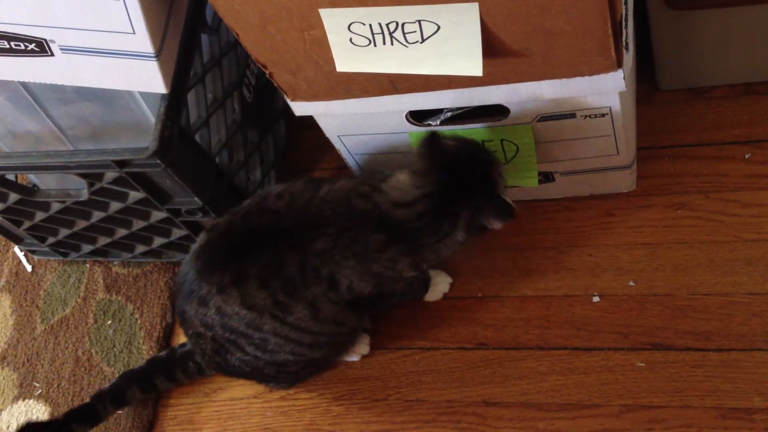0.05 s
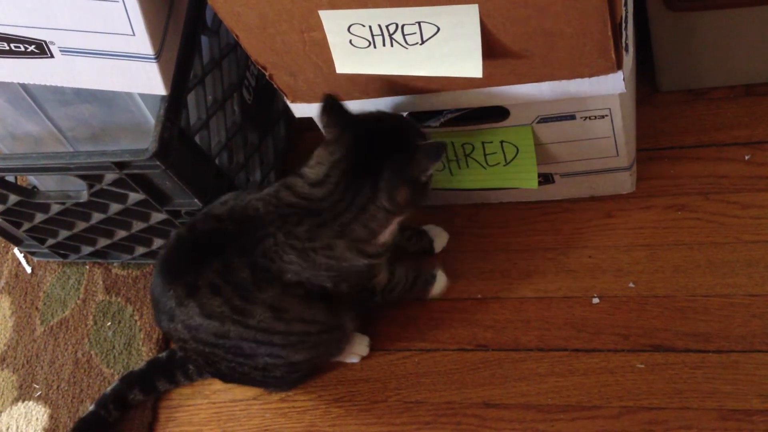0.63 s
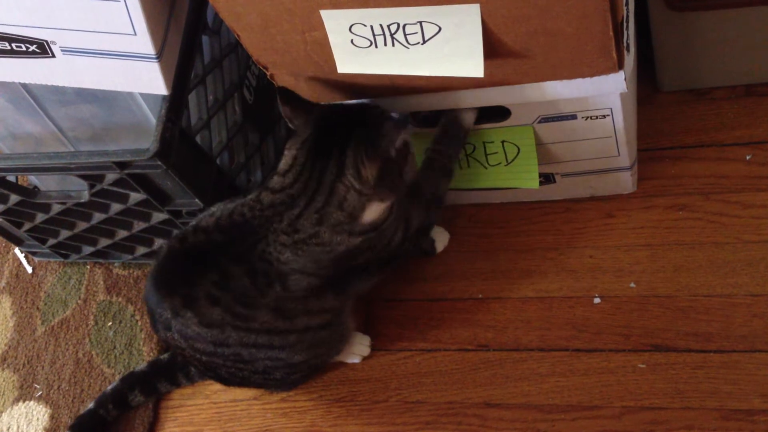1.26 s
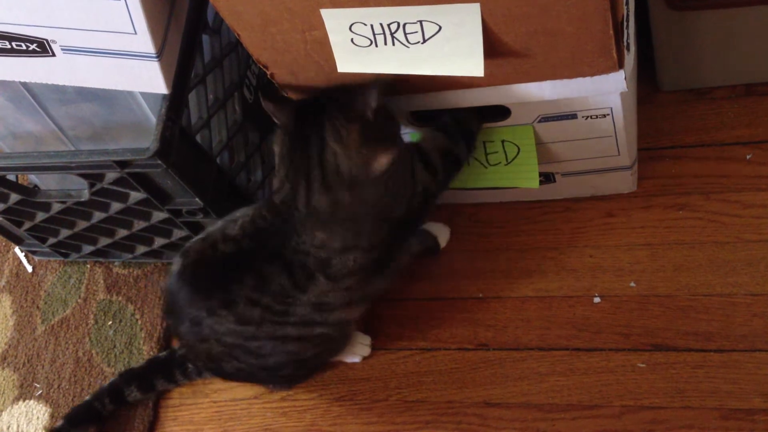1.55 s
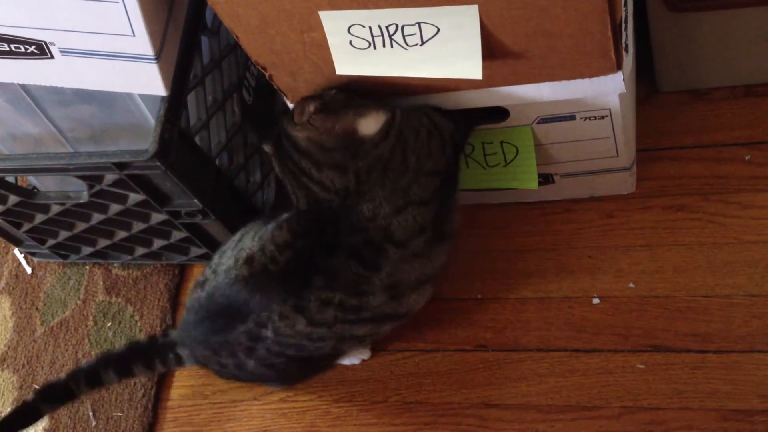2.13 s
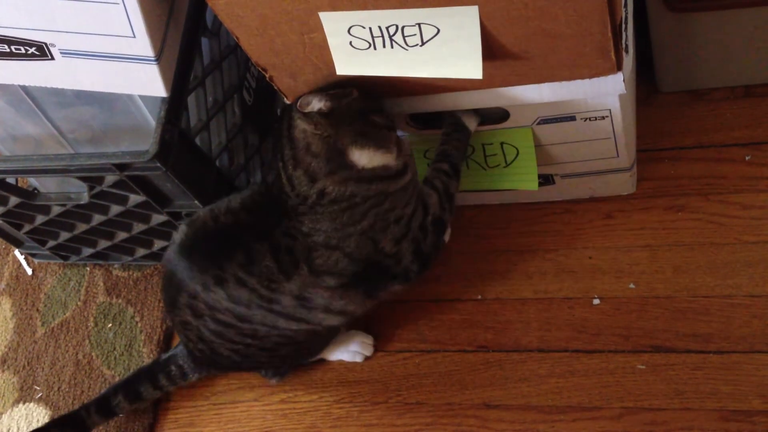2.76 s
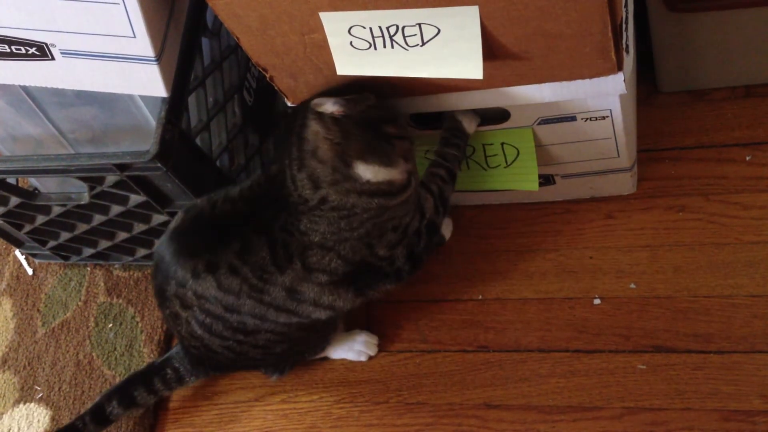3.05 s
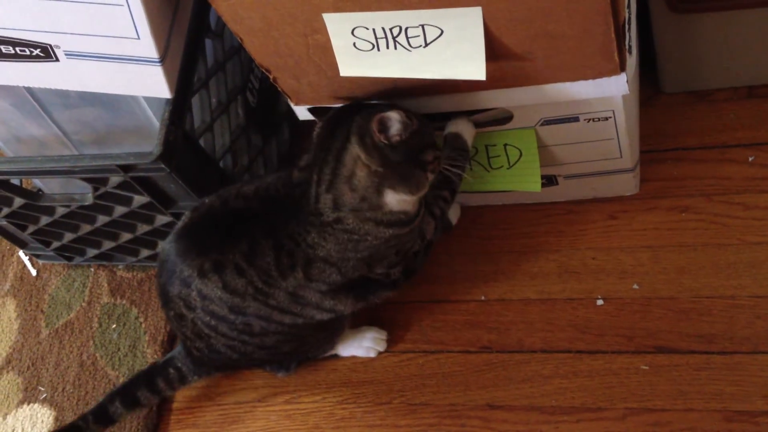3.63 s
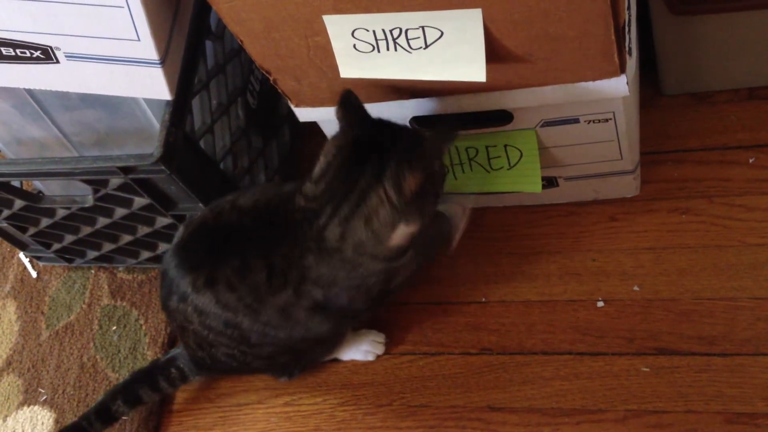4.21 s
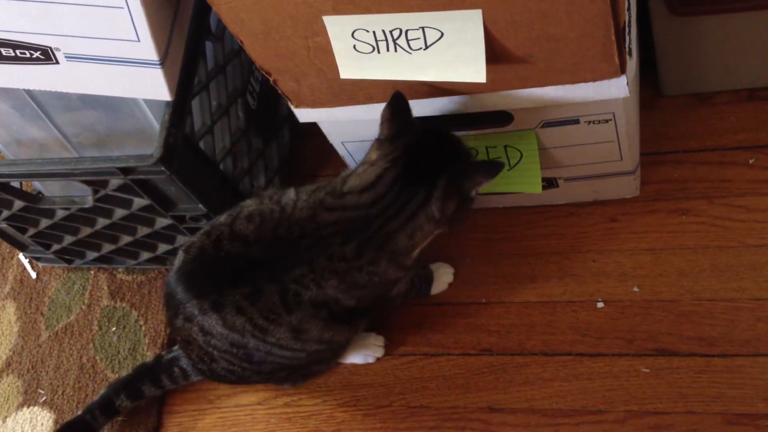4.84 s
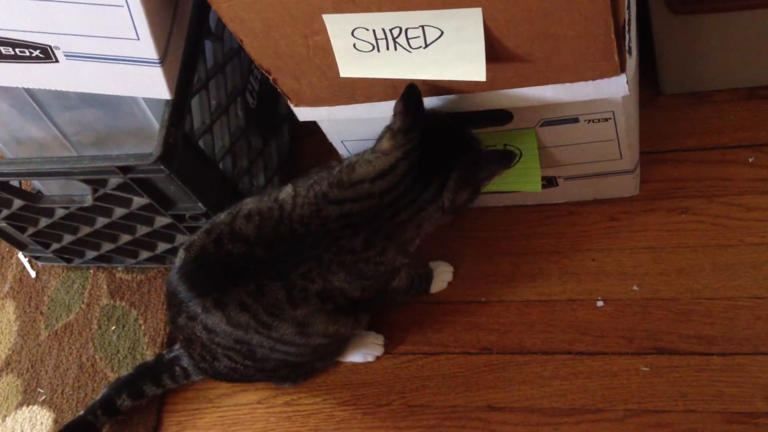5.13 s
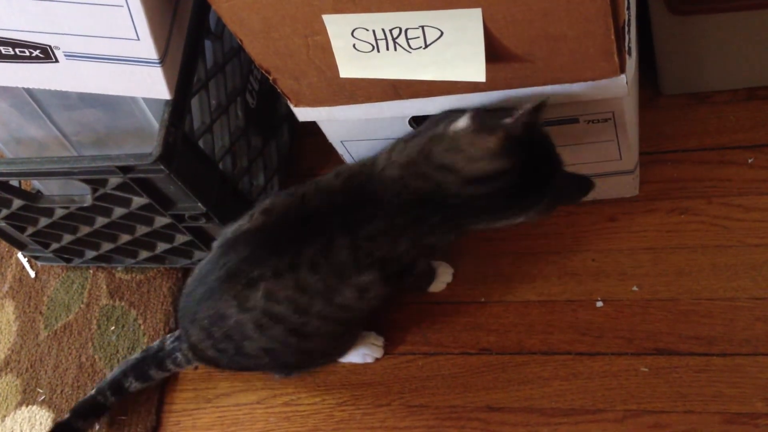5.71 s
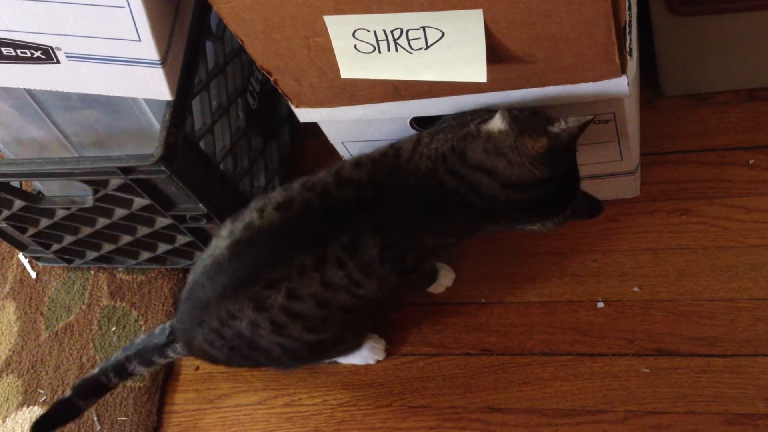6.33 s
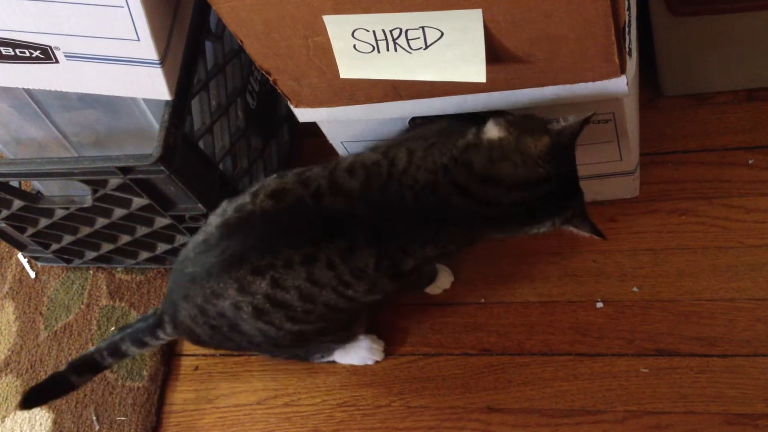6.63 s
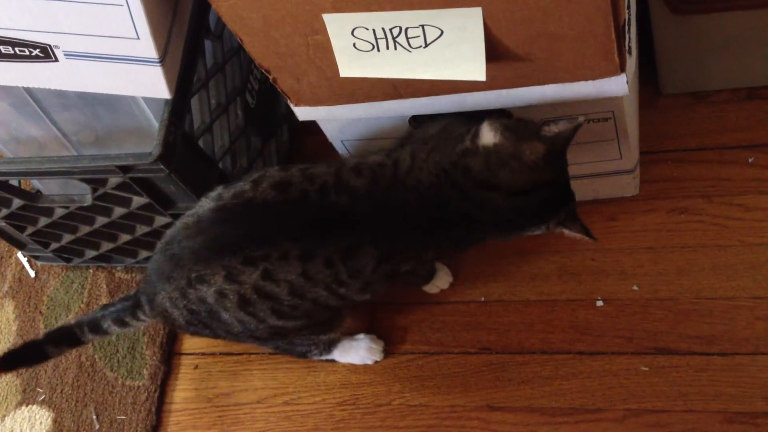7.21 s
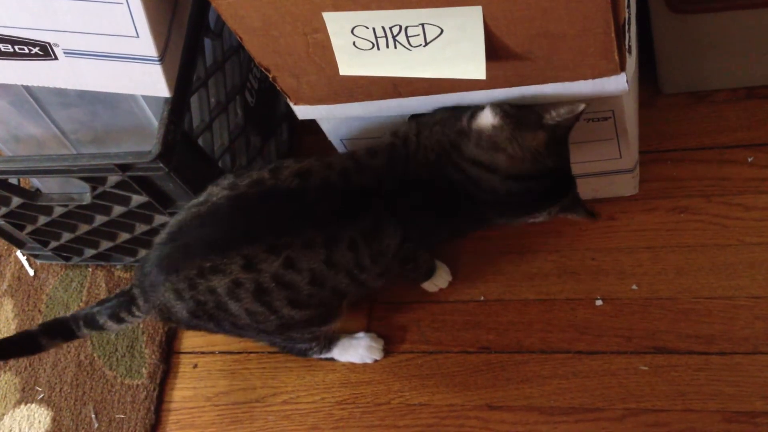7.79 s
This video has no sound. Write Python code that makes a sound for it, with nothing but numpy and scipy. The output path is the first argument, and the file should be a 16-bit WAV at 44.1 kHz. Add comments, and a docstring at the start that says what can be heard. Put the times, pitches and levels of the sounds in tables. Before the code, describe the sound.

Light claw taps and paper brushing come from a cardboard box, heard from nearby in a quiet room. A cat tugs and a sheet tears briefly with small crackles. Then the cardboard snaps back loudly twice, each time with a hollow thud. Following a short lull, faint rustles and scrapes return as the paw feels around inside, bumping the wall with a couple of clear, hollow knocks.

```python
"""A cat claws at paper through the hand hole of a cardboard file box, in a small quiet room.
From about 1 s, paper fibres snap, claws catch the cardboard and let it spring back, and a leg
brushes the sheets. Near 2.3 s the cat tugs, the wall trembles and a sheet tears in a short rip.
The two loudest plucks follow, at 3.4 s and 4 s. From about 5.3 s a paw gropes inside the box:
it brushes the sheets, drags a claw over them and knocks on the hollow wall."""
import sys
import numpy as np
from scipy import signal
from scipy.io import wavfile

SR = 44100
rng = np.random.default_rng(int(sys.argv[2]) if len(sys.argv) > 2 else 0)


def materialize(psi):
    """Save the field psi as 16-bit PCM at rate SR to the path in sys.argv[1].

    A 1-D psi becomes a single channel; in a 2-D psi each row is a channel.
    """
    bounded = np.clip(np.atleast_2d(psi).T, -1, 1)
    quanta = np.round(bounded * 32767).astype(np.int16)
    wavfile.write(sys.argv[1], SR, quanta)


N = 351036
TIME = np.arange(N) / SR  # seconds into the scene
HIT_TIME = np.arange(8192) / SR  # seconds into one short sound

# Paper fibres break. Each row: start in seconds, level in dB.
FIBRE_SNAPS = [(0.9522, -58), (1.024, -65), (1.053, -60), (1.296, -61.5), (2.105, -58.5), (2.2935, -57),
               (2.466, -50), (2.4937, -43), (2.5135, -38.5), (2.5371, -42), (2.5544, -43), (2.5605, -32),
               (2.5672, -40), (2.596, -36), (2.615, -39.5), (2.6944, -33.5), (2.805, -65), (2.9897, -66.5),
               (3.02, -64.5), (3.0629, -54), (3.407, -27.5), (4.0322, -24.5)]
# Claws pluck the box wall. Each row: start in seconds, then crack, low thud and hollow clack in dB.
CLAW_PLUCKS = [(0.9579, -55.5, -40.5, -41), (0.9756, -60.5, -44, -50.5), (1.1012, -56.5, -49.5, -54),
               (1.155, -68, -51.5, -62), (1.2174, -66, -57, -54), (1.2355, -63.5, -45.5, -50.5),
               (1.295, -58.5, -54, -56.5), (1.3529, -65, -60, -50.5), (1.4019, -58.5, -42.5, -48.5),
               (1.565, -79, -56, -82), (1.8715, -51.5, -46.5, -55), (2.1264, -52.5, -33.5, -46),
               (2.2171, -58, -29.5, -56), (2.2359, -50.5, -26.5, -36), (2.3239, -58, -36, -53),
               (2.424, -47, -41, -54), (2.462, -41.5, -25.5, -28.5), (2.4814, -41, -34.5, -34.5),
               (2.5124, -58.5, -32, -39), (2.5638, -46, -36.5, -40.5), (2.6942, -49, -32.5, -39.5),
               (2.7096, -39, -41.5, -35), (2.9204, -60, -55, -68), (3.0556, -59, -47, -54.5),
               (3.1243, -41, -25.5, -38), (3.1328, -56, -31, -35), (3.192, -44, -28, -38.5),
               (3.3826, -28, -15, -17), (3.3966, -25, -30.5, -25), (3.407, -24.5, -17.5, -17),
               (3.6119, -64, -67.5, -59.5), (3.6864, -75, -58, -60.5), (3.9201, -80, -54.5, -64.5),
               (4.0272, -26, -16.5, -19), (4.0326, -44.5, -19.5, -25.5)]
# The leg brushes over paper. Each row: middle in seconds, length in seconds, level in dB.
LEG_BRUSHES = [(1.125, 0.16, -58.5), (1.235, 0.043, -60), (1.38, .12, -55), (1.645, 0.17, -60),
               (1.78, 0.1, -62.5), (1.915, 0.18, -59.5), (2.12, 0.066, -52.5), (2.29, 0.18, -56),
               (2.38, 0.12, -46), (2.55, .26, -53.5), (3.995, 0.13, -57.5), (5.263, 0.065, -61.5),
               (5.52, 0.33, -66), (5.675, 0.12, -55), (5.83, 0.45, -57.5), (6.23, 0.28, -57),
               (6.44, 0.32, -57.5), (6.75, 0.26, -56.5), (7.01, 0.32, -58), (7.295, 0.18, -54),
               (7.44, 0.36, -63.5), (7.63, .2, -67.5), (7.752, 0.16, -52.5), (7.95, 0.24, -62)]
# Claws scrape the cardboard. Each row: middle in seconds, length in seconds, level in dB.
CLAW_SCRAPES = [(1.22, 0.12, -61), (2.05, .12, -66.5), (2.33, 0.34, -53.5), (2.455, .07, -39.5),
                (2.57, 0.28, -54.5), (3.7, .3, -76.5), (3.772, 0.079, -63.5), (5.81, .17, -56),
                (6.23, .2, -65.5), (6.37, 0.25, -58), (6.93, 0.28, -56), (7.295, 0.052, -53),
                (7.41, 0.34, -58.5), (7.77, 0.081, -57.5), (7.88, 0.2, -59)]
# How loud the rip is as it runs. Each row: time in seconds, level in dB.
RIP_LEVELS = [(2.25, -70), (2.3, -55), (2.41, -63), (2.424, -39.5), (2.45, -58), (2.475, -36.5),
              (2.505, -44), (2.55, -53), (2.59, -55), (2.661, -82)]
# A claw drags on a sheet. Each row: start in seconds, length in seconds, level in dB, pitch in Hz.
CLAW_DRAGS = [(5.72, 0.21, -61, 2020), (6.816, 0.075, -61.5, 2120), (6.939, 0.09, -57, 2260),
              (7.306, 0.16, -58.5, 1730), (7.823, 0.11, -59.5, 1600)]
# The paw knocks from inside. Each row: start in seconds, hollow clack in dB, low thud in dB.
PAW_KNOCKS = [(5.837, -69, -43.5), (5.867, -38, -34.5), (5.931, -58, -45.5), (6.317, -50.5, -42),
              (6.421, -19.5, -29.5), (6.897, -25, -30.5), (6.978, -43, -58), (7.036, -51.5, -46),
              (7.441, -49, -39.5), (7.482, -52, -45.5), (7.844, -61, -45.5), (7.864, -48, -48),
              (7.903, -57, -38.5)]

# The tones the box rings with (its modes). Each row: pitch in Hz, strength in dB.
RIM_TONES = [(135, -7), (179, -0.5), (205, 0.5), (250, -2), (292, -10.5), (334, -7), (415, -5), (468, -3.5),
             (510, -8.5), (550, -14.5), (642, -12.5), (678, -17.5), (713, -22), (762, -8.5), (844, -12),
             (892, -15), (931, -13), (1059, -18.5), (1192, -23.5), (1261, -24.5), (1444, -28), (1657, -24),
             (1816, -25.5), (1892, -22.5), (1986, -26), (2015, -29.5), (2328, -26.5)]  # plucked at the rim
WALL_TONES = [(105, -21), (158, 0), (210, 5.5), (252, 4), (332, -3.5), (369, -5), (410, 13), (528, -32),
              (572, 14), (620, 10.5), (669, -38), (705, -0.5), (748, 6.5), (807, 3.5), (882, -2), (947, 3),
              (989, 2), (1066, -20), (1235, -29), (1452, -38), (2169, -31)]  # knocked from inside

# Spectra: how strong a noise is from bass to treble. Each row: frequency in Hz, level in dB.
BACKGROUND_SPECTRUM = [(25, -37), (55, -34), (85, -17.5), (130, -9), (190, -1.5), (260, -5.5), (450, -11.5),
                       (900, -19), (2000, -23.5), (7500, -26), (10000, -36.5), (13500, -27), (15500, -31.5)]  # murmur and hiss
SNAP_SPECTRUM = [(30, -14), (500, -10), (1500, -9), (3000, -7), (4200, 0.5), (7000, 3.5), (8500, 0.5),
                 (11000, -12), (15000, -17.5)]  # paper fibres breaking
CRACK_SPECTRUM = [(25, 2), (60, -1.5), (110, -5.5), (600, -5.5), (1200, 6), (2000, 3.5), (3000, 1),
                  (4700, 1.5), (6500, -3.5), (8000, -2.5), (9800, -10), (12000, -3.5), (15000, -12)]  # cardboard fibres cracking
PANEL_SPECTRUM = [(60, -50), (250, -21.5), (450, -1.5), (700, 0), (1000, 3), (1400, -11.5), (2200, -15.5),
                  (5000, -33), (15000, -60)]  # the wall's many weak, overlapping tones
SWISH_SPECTRUM = [(80, -27), (300, -3), (450, 5), (850, 6.5), (1400, -6.5), (2200, -3), (4000, -2.5),
                  (7500, 3), (9800, -7.5), (12500, -1.5), (15000, -3.5)]  # leg on paper
SCRAPE_SPECTRUM = [(60, -36), (250, -11.5), (550, 0), (1000, 3), (1500, -3), (2100, -3), (3200, -7.5),
                   (6000, -16.5), (15000, -29.5)]  # claws on cardboard
RIP_SPECTRUM = [(30, -8.5), (500, -4.5), (1500, -8), (2500, 0), (4200, 6), (5500, -0.5), (8000, -4.5),
                (10000, -23), (15000, -21)]  # paper tearing
SCUFF_SPECTRUM = [(60, -15), (300, -16), (1200, 8.5), (2500, 5), (4000, -2), (7000, -8), (10000, -21.5),
                  (15000, -19)]  # paw meeting the wall

# Early echoes from floor and furniture. Each row: delay in seconds, level in dB.
ROOM_ECHOES = [(.0043, -19), (.0092, -20), (0.0128, -15), (0.0206, -25.5), (.0235, -21.5)]
# How long the room rings. Each row: frequency in Hz, seconds to fade by 60 dB.
ROOM_FADE = [(100, 0.17), (300, 0.34), (1000, 0.33), (3000, 0.32), (7000, .22), (14000, 0.26)]


def amp(db):
    """Turn decibels into a number to multiply by."""
    return 10 ** (np.asarray(db) / 20)


def unit_level(x):
    """Scale a sound so that its average level (rms) is 1."""
    return x / np.sqrt(np.mean(x ** 2) + 1e-20)


def unit_hit(x):
    """Scale a short sound to the energy of 10 ms at level 1."""
    return x / np.sqrt(np.sum(x ** 2) / (SR / 100) + 1e-20)


def look_up(table, hz):
    """Read between a table's rows, with frequencies spaced like musical pitch."""
    row_hz, values = np.transpose(table)
    return np.interp(np.log(hz + 1), np.log(row_hz + 1), values)


def add(mix, start, sound):
    """Mix a sound in at a start time in seconds."""
    part = mix[max(round(start * SR), 0):][:len(sound)]
    part += sound[:len(part)]


def colour(x, spectrum):
    """Give a sound a spectrum. The filter never rings ahead of a hit, so hits stay sharp."""
    log_gain = np.log(amp(look_up(spectrum, abs(np.fft.fftfreq(4096, 1 / SR)))))
    taps = np.fft.ifft(np.exp(np.conj(signal.hilbert(log_gain)))).real
    return signal.oaconvolve(x, taps[:len(taps) // 2])[:len(x)]


def burst(decay_s, linger_s, linger_db):
    """A spray of tiny breaks: it swells and dies fast, then the sheet rattles weakly."""
    age = HIT_TIME / max(decay_s, 0.0002)
    rattle = amp(linger_db) * np.exp(-HIT_TIME / linger_s)
    return rng.standard_normal(len(HIT_TIME)) * (1 - np.exp(-age)) * (np.exp(-age) + rattle)


def background(level_db=-66):
    """The low murmur of the room's air, with faint microphone hiss."""
    return amp(level_db) * unit_level(colour(rng.standard_normal(N), BACKGROUND_SPECTRUM))


def fibre_snaps(patch_hz=6370, pitch_spread=0.18):
    """Each breaking bundle of fibres is one sharp click that rings a small patch of paper."""
    out = np.zeros(N)
    for start, db in FIBRE_SNAPS:
        hz = patch_hz * (1 + pitch_spread * rng.uniform(-0.75, 1))
        click = unit_hit(signal.unit_impulse(len(HIT_TIME), round(0.0006 * SR)))
        splinters = unit_hit(burst(decay_s=0.0011, linger_s=0.0056, linger_db=-22.5))
        tick = unit_hit(colour(click + 2.3 * splinters, SNAP_SPECTRUM))
        patch = unit_hit(np.sin(2 * np.pi * hz * HIT_TIME) * HIT_TIME * np.exp(-HIT_TIME / 0.00016))
        add(out, start, amp(db) * (tick + 0.6 * patch))
    return out


def ring(tones, scatter_db, width_hz=24, loss=0.0083):
    """One row for each fading tone. Cardboard damps high ones sooner, and no two hits are alike."""
    hz, db = np.transpose(tones)[:, :, None]
    width = width_hz + loss * hz  # a wider tone dies sooner
    size = amp(db + scatter_db * rng.standard_normal(hz.shape)) * width
    waves = np.sin(2 * np.pi * (hz * HIT_TIME + rng.random(hz.shape)))
    return size * np.exp(-np.pi * width * HIT_TIME) * waves


def cut_bass(x, below_hz):
    """Take away the deepest bass, below a given pitch."""
    return signal.sosfilt(signal.butter(4, below_hz, "high", fs=SR, output="sos"), x)


def box_hit(tones, thud_db, clack_db, thud_rise_s, clack_rise_s, width_hz, loss, weak_gain):
    """The whole wall swings in its low tones (the thud); the high ones soon die (the clack)."""
    ringing = ring(tones, scatter_db=2.0, width_hz=width_hz, loss=loss)
    is_low = np.transpose(tones)[0] < 380  # Hz
    thud = ringing[is_low].sum(0) * (1 - np.exp(-HIT_TIME / thud_rise_s))
    clack = ringing[~is_low].sum(0) * (1 - np.exp(-HIT_TIME / clack_rise_s))
    clack *= 1 + 1.6 * np.exp(-HIT_TIME / 0.005)  # a hard-bent wall loses most of its swing early
    weak_tones = colour(burst(decay_s=0.0017, linger_s=0.02, linger_db=-21), PANEL_SPECTRUM)
    clack = unit_hit(cut_bass(clack, below_hz=266)) + weak_gain * unit_hit(weak_tones)
    return amp(thud_db) * unit_hit(cut_bass(thud, below_hz=115)) + amp(clack_db) * unit_hit(clack)


def claw_plucks():
    """A claw slips off the rim: fibres crack and the wall springs back."""
    out = np.zeros(N)
    for start, crack_db, thud_db, clack_db in CLAW_PLUCKS:
        slip_s = 0.00026 * amp(-0.5 * crack_db)  # a gentle pull lets go more slowly
        crack = colour(burst(decay_s=slip_s, linger_s=0.021, linger_db=-22.5), CRACK_SPECTRUM)
        add(out, start, amp(crack_db) * unit_hit(crack))
        spring = box_hit(RIM_TONES, thud_db, clack_db, thud_rise_s=0.00053, clack_rise_s=0.00082,
                         width_hz=17, loss=0.012, weak_gain=0.31)
        add(out, start + 0.00025, spring)
    return out


def stick_slip(per_second, spread_db, smooth):
    """Surfaces catch and let go: clicks of uneven size over a smooth rubbing noise."""
    size = amp(spread_db * np.minimum(rng.exponential(1, N), 4))
    clicks = (rng.random(N) < per_second / SR) * rng.choice([-1, 1], N) * size
    return unit_level(clicks) + smooth * rng.standard_normal(N)


def stroke_levels(strokes, end_db=-18.5, roundness=1.34, lean=0.06):
    """Loudness over time: each stroke speeds up, peaks and slows down along the same arch."""
    power = np.zeros(N)
    for middle, length, db in strokes:
        position = (TIME - middle) / (length / 2)  # -1 at the start, 1 at the end
        from_peak = abs(position) * (1 - lean * np.sign(position))  # rises faster than it falls
        power += amp(db + end_db * np.minimum(from_peak, 10) ** roundness) ** 2
    return np.sqrt(power)


def rubbing():
    """The leg slides over paper and claws scrape cardboard. Both shake the wall, as does the tug."""
    brushing, scraping = stroke_levels(LEG_BRUSHES), stroke_levels(CLAW_SCRAPES)
    grating = np.hypot(scraping, amp(-8) * brushing)  # brushing scrapes a little too
    shaking = np.hypot(amp(-2) * brushing, amp(2) * scraping) + tug_level()
    swish = colour(stick_slip(per_second=3000, spread_db=12.0, smooth=3.1), SWISH_SPECTRUM)
    scrape = colour(stick_slip(per_second=760, spread_db=-0.5, smooth=0.89), SCRAPE_SPECTRUM)
    slips = stick_slip(per_second=390, spread_db=3.0, smooth=0.78)
    shudder = signal.oaconvolve(slips, ring(RIM_TONES, scatter_db=1.86).sum(0))[:N]
    shudder = colour(shudder, [(60, -0.5), (120, 3), (280, 2.0), (600, -3), (2000, -19.5)])  # Hz, dB
    shudder = cut_bass(shudder, below_hz=105)
    return brushing * unit_level(swish) + grating * unit_level(scrape) + shaking * unit_level(shudder)


def tug_level(start_s=2.25, end_s=2.55, level_db=-48, rise_s=0.01, release_s=0.058):
    """The cat pulls the sheet: strain on the wall builds quickly, holds, then lets go."""
    rise = np.clip((TIME - start_s) / rise_s, 0, 1)
    release = np.exp(-np.maximum(TIME - end_s, 0) / release_s)
    return amp(level_db) * rise * release


def paper_rip():
    """The tear runs through the sheet in many small, separate breaks."""
    times, db = np.transpose(RIP_LEVELS)
    level = amp(np.interp(TIME, times, db, left=-120, right=-120))
    breaks = stick_slip(per_second=550, spread_db=3.5, smooth=0.12)
    one_break = burst(decay_s=0.0002, linger_s=0.0015, linger_db=-25)
    crackle = signal.oaconvolve(breaks, one_break)[:N]
    return level * unit_level(colour(crackle, RIP_SPECTRUM))


def claw_drags():
    """A claw tip chatters over the paper's grain, and the sheet rings loosely around one pitch."""
    out = np.zeros(N)
    chatter = stick_slip(per_second=760, spread_db=6.5, smooth=0.35)
    chatter = colour(chatter, PANEL_SPECTRUM) + 0.18 * chatter
    for start, length, db, hz in CLAW_DRAGS:
        rasp = signal.lfilter(*signal.iirpeak(hz, Q=3, fs=SR), chatter)
        rasp = signal.lfilter(*signal.iirpeak(hz, Q=2, fs=SR), rasp)
        rasp = rasp[round(start * SR):][:round(length * SR)]
        add(out, start, amp(db) * unit_level(rasp) * signal.windows.hann(len(rasp)))
    return out


def paw_knocks(echo_s=0.021):
    """A padded paw bumps the wall: a dull, hollow knock, then one fainter repeat, like a near echo."""
    out = np.zeros(N)
    for start, clack_db, thud_db in PAW_KNOCKS:
        contact_s = 0.0019 * amp(-0.3 * clack_db)  # light touches are longer and softer
        scuff = colour(burst(decay_s=contact_s, linger_s=0.042, linger_db=-19), SCUFF_SPECTRUM)
        scuff_db = -7.5 + 1.65 * clack_db  # hard knocks scuff far more
        add(out, start, amp(scuff_db) * unit_hit(scuff))
        bump = (start, thud_db, clack_db)
        echo = (start + echo_s, thud_db - 6, clack_db - 12.5)
        for when, thud, clack in (bump, echo):
            knock = box_hit(WALL_TONES, thud, clack, thud_rise_s=0.0013, clack_rise_s=0.00041,
                            width_hz=23.4, loss=0.011, weak_gain=0.24)
            add(out, when, knock)
    return out


def room(x, tail_db, build_s):
    """The room adds a few near echoes, then a short wash that lasts longest in the middle pitches."""
    hz, times, noise = signal.stft(rng.standard_normal(SR // 2), SR, nperseg=256)
    fade = amp(-60 * times / look_up(ROOM_FADE, hz)[:, None])
    tail = signal.istft(noise * fade, SR, nperseg=256)[1]
    tail *= 1 - np.exp(-(np.arange(len(tail)) / SR / build_s) ** 2)
    response = amp(tail_db) * tail / np.linalg.norm(tail)
    for delay, db in ROOM_ECHOES:
        add(response, delay, amp(db) * signal.windows.hann(5) / 2)
    return x + signal.oaconvolve(x, response)[:N]


def scene():
    """All the sounds of the box ring in the room, over the quiet background, in one channel."""
    box = claw_plucks() + paw_knocks() + fibre_snaps() + paper_rip() + rubbing() + claw_drags()
    return (room(box, tail_db=-12.5, build_s=0.0059) + background())[None]


def record(dry):
    """Cut off the highest treble, above 15400 Hz."""
    low_pass = signal.firwin(301, 15400, window=("kaiser", 8), fs=SR)
    return signal.oaconvolve(dry, low_pass[None], "same")


dry = scene()
out = record(dry)
materialize(out)
```